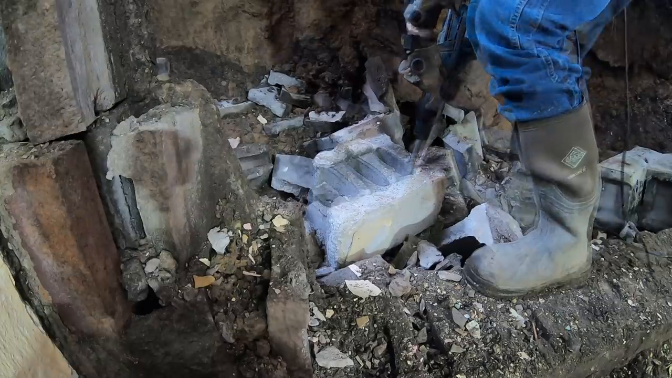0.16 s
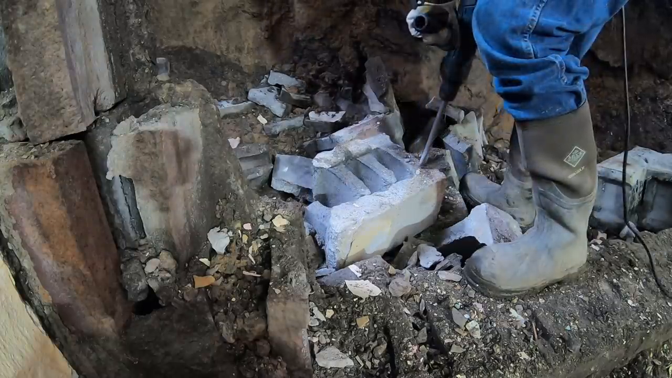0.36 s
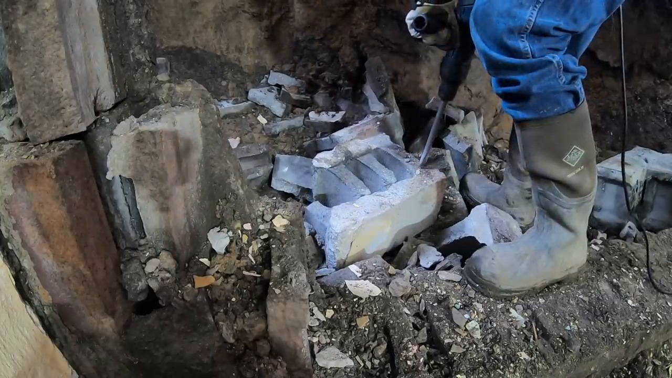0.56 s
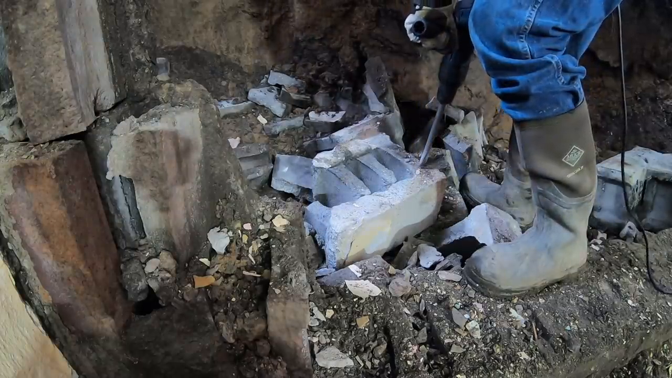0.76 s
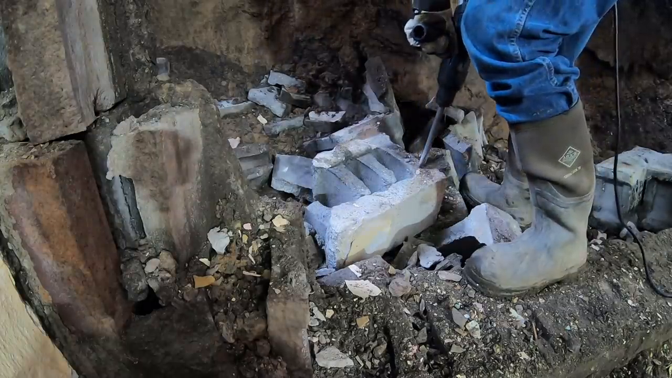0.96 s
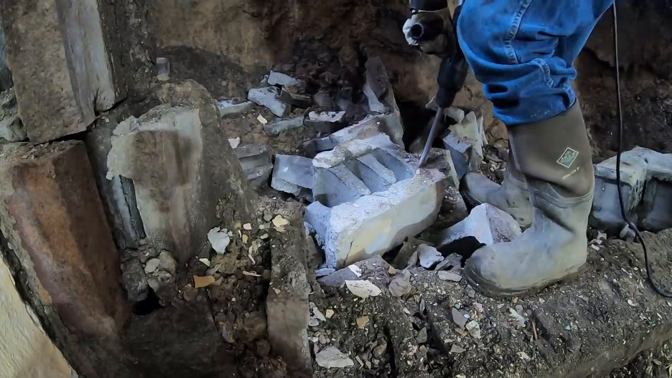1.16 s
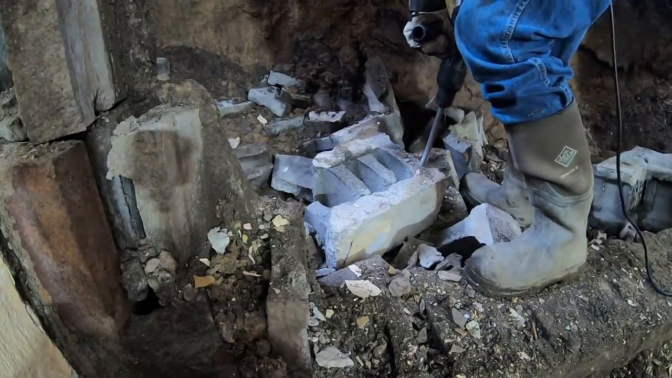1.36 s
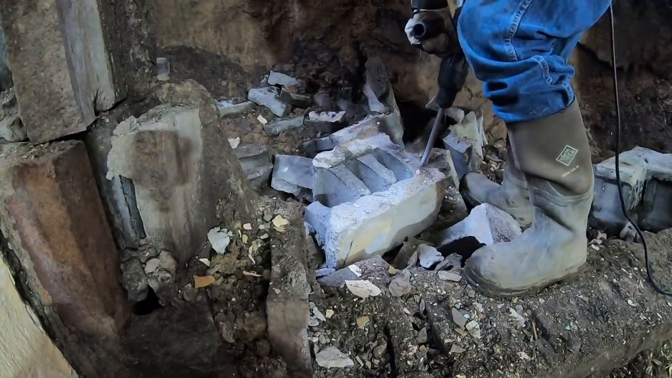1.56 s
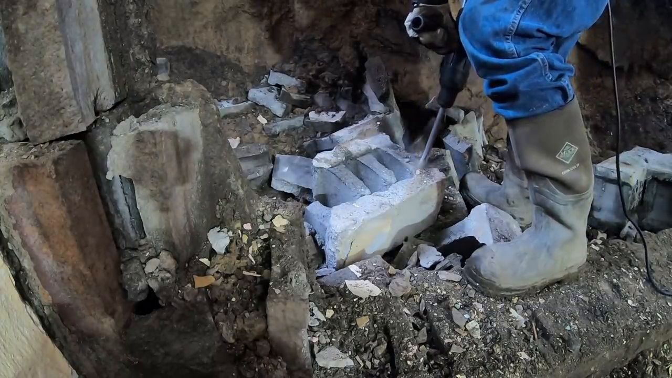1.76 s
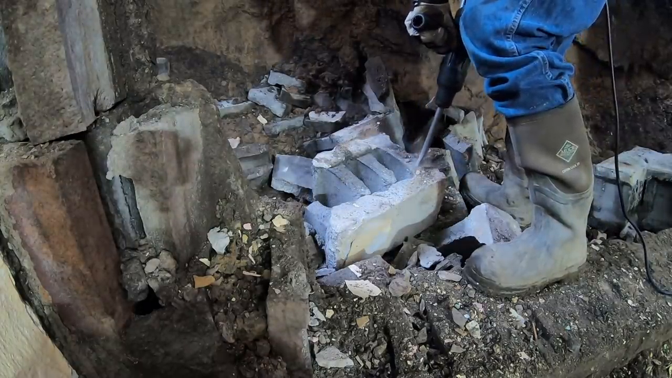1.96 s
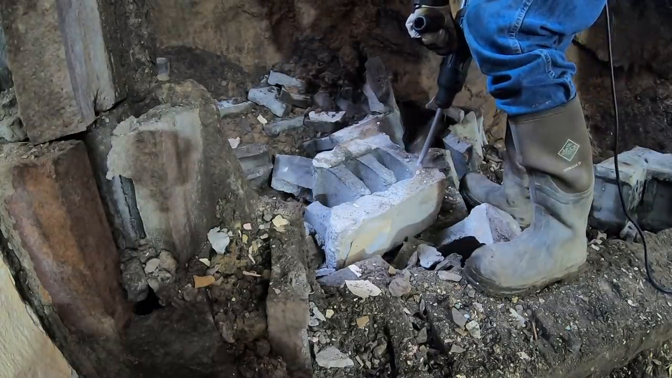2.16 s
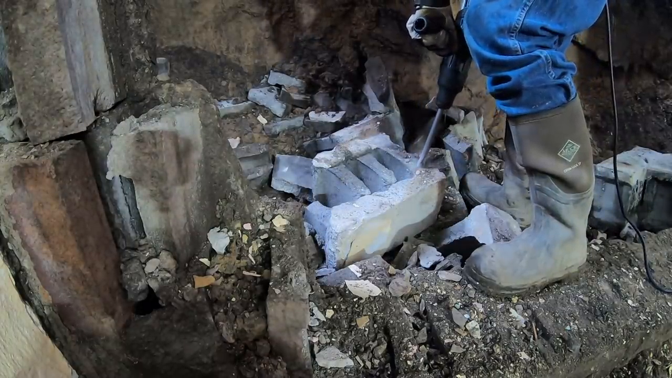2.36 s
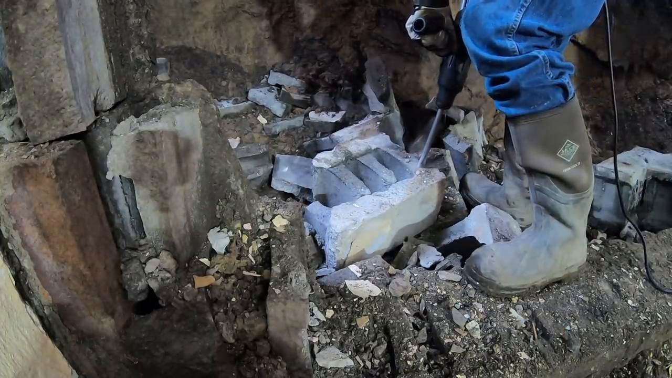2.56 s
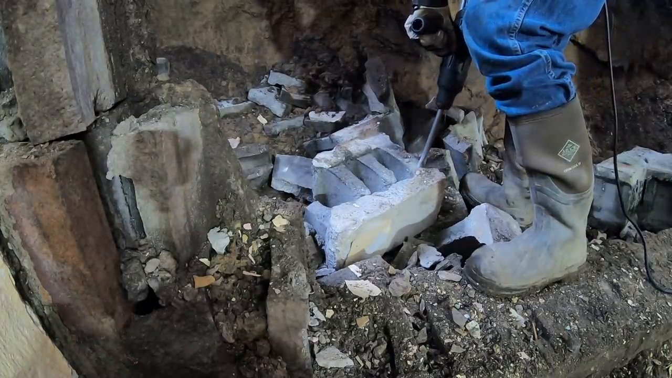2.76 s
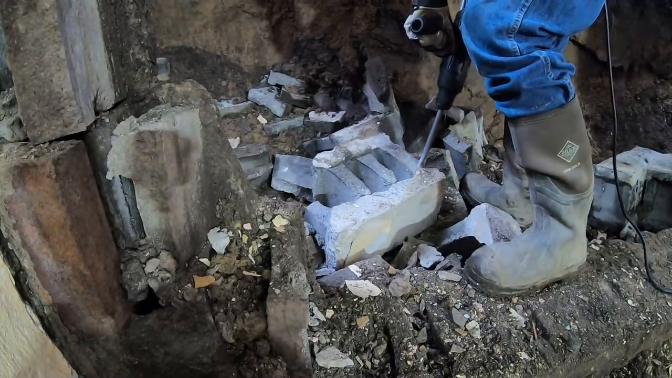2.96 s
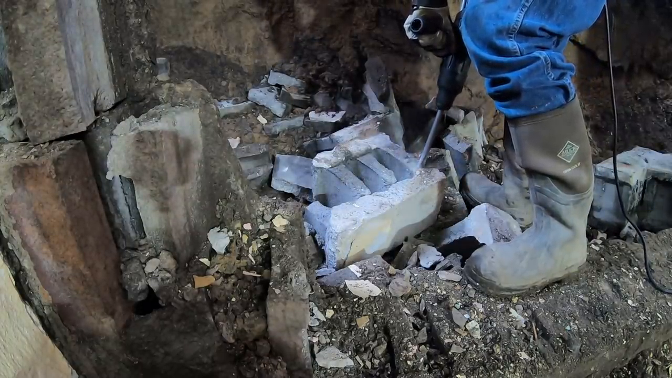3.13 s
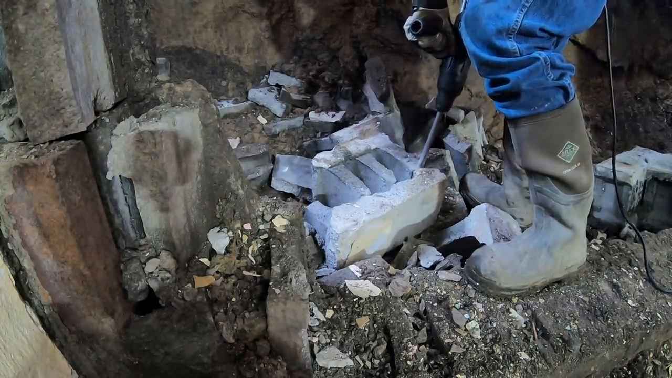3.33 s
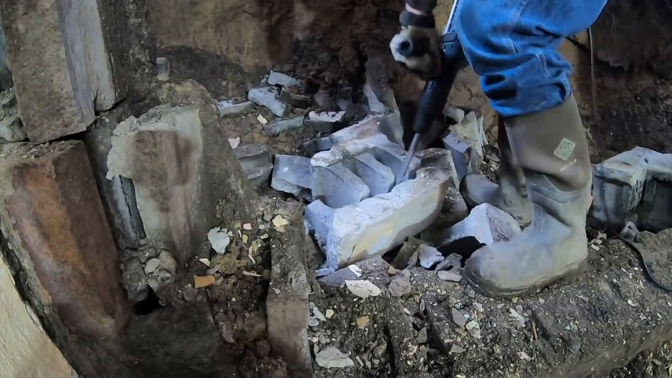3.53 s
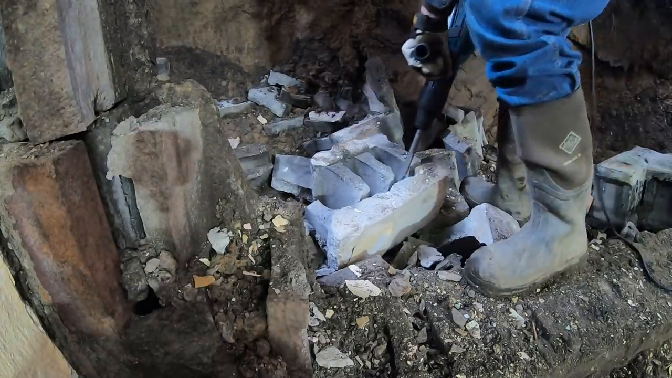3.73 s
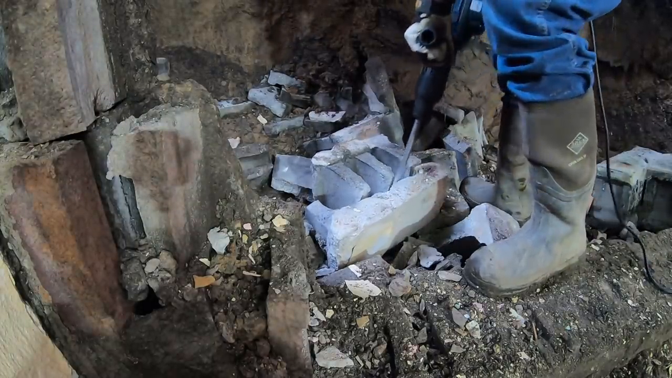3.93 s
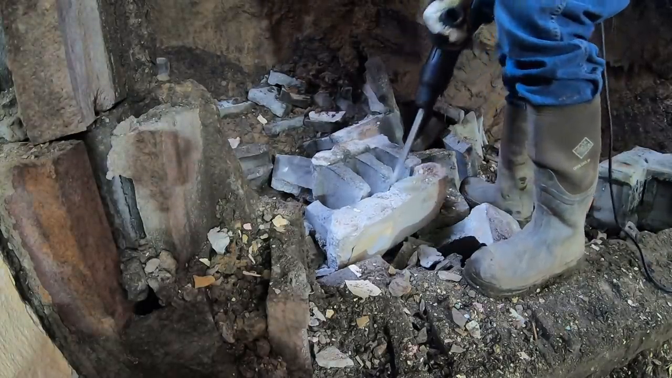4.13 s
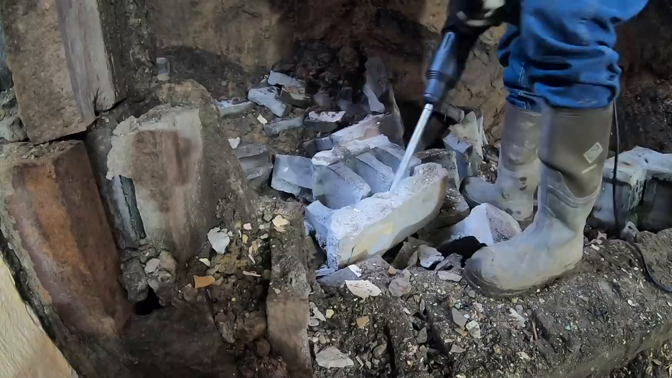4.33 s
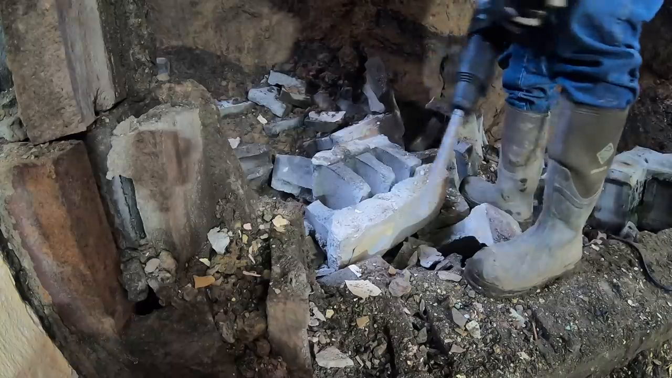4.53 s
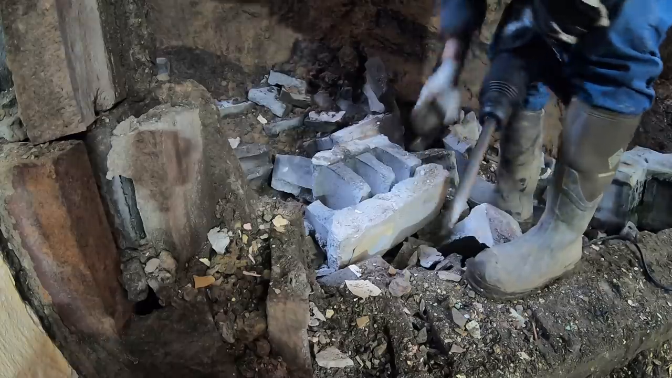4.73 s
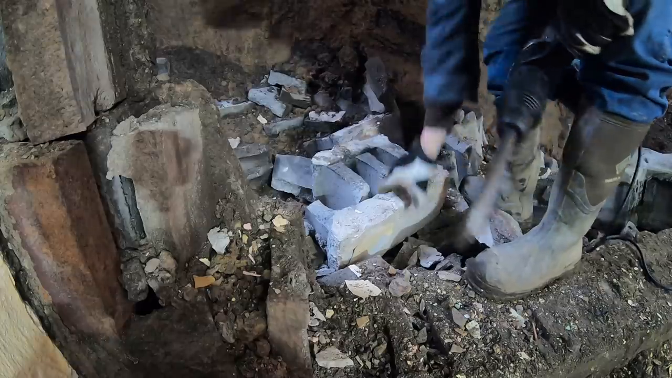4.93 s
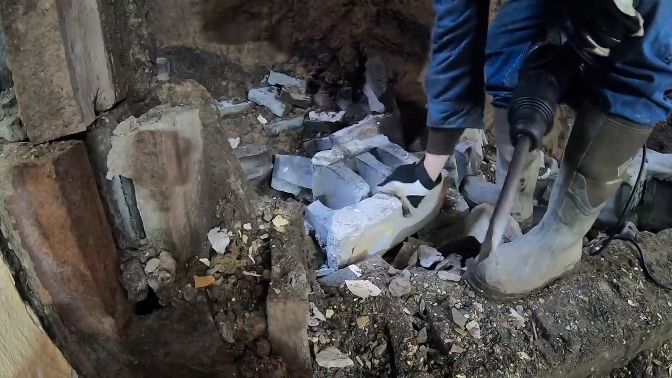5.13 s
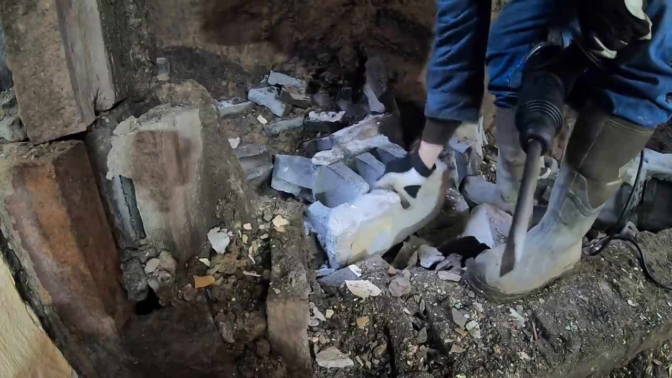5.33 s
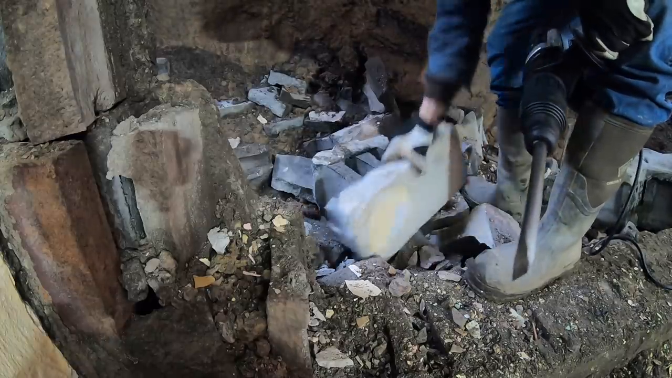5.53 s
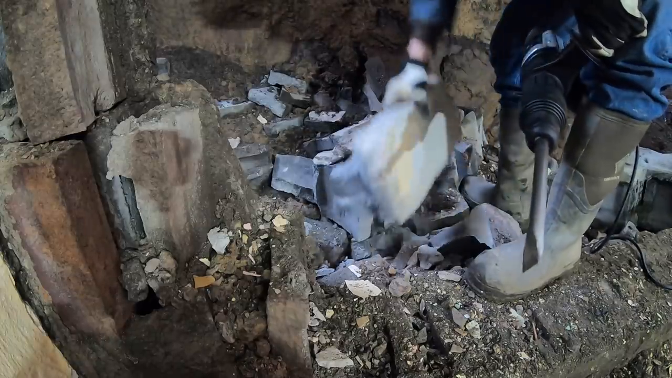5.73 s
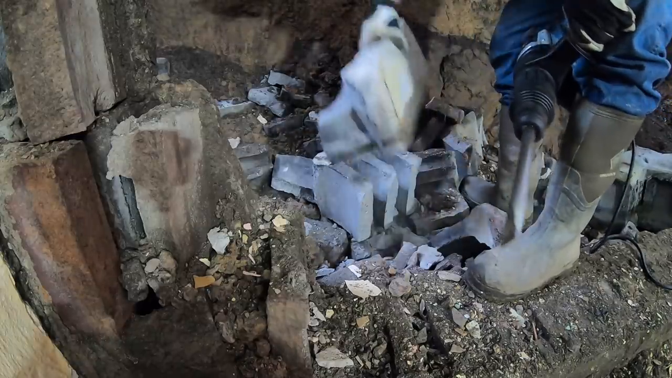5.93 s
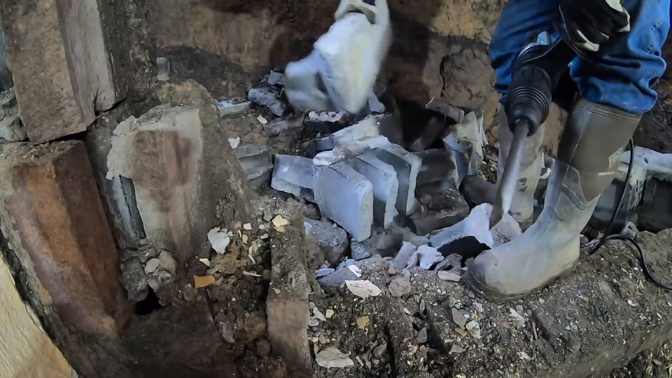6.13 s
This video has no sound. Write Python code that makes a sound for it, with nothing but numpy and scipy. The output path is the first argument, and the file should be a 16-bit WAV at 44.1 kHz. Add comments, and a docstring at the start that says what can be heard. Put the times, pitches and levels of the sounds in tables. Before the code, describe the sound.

An electric demolition hammer chisels a concrete block in two bursts and winds down, then a loose piece scrapes and clinks over rubble.

```python
"""An electric demolition hammer chisels a hollow concrete block in two bursts in a basement. Each piston
blow rings the steel and the block and thuds through the floor; the motor whirrs, rattles and whines,
coasting down after each burst. Chips drop, then a loose piece is dragged off the pile, knocking and
ringing. A generator drones outside; a camera with two microphones stands close by, shaken by the blows."""
import sys
import numpy as np
from scipy import signal
from scipy.fft import rfft, irfft, next_fast_len
from scipy.io import wavfile
from scipy.ndimage import uniform_filter1d

SR = 44100
rng = np.random.default_rng(int(sys.argv[2]) if len(sys.argv) > 2 else 0)


def store_pcm(level_fs):
    """Save levels as 16-bit WAV."""
    pcm = np.round(np.clip(level_fs, -1, 1) * 32767).astype(np.int16)
    wavfile.write(sys.argv[1], SR, np.atleast_2d(pcm).T)


N = 277371
T = np.arange(N) / SR
IDLE_HZ = 52.5  # crank speed the motor races toward once the chisel is free

# hammer bursts: start_s, chisel_free_s, switch_off_s, start_speed_hz, working_speed_hz, coast_time_s
BURSTS = [(.0027, .372, .32, 44.42, 44.42, .8), (1.1454, 3.548, 3.7, 10.91, 45.923, 1.15)]


def amp(db):
    return 10 ** (np.asarray(db) / 20)


def unit_rms(x):
    return x / np.sqrt(np.mean(x ** 2) + 1e-20)


def curves(rows):
    """One curve per column after the time, drawn through the breakpoints."""
    times, *columns = np.transpose(rows)
    return [np.interp(T, times, column) for column in columns]


def equalise(x, points):
    """Zero-phase EQ through (frequency_hz, gain_db) points."""
    size = next_fast_len(N + 4096)
    bins = np.fft.rfftfreq(size, 1 / SR)
    hz, db = np.transpose(points)
    gain = amp(np.interp(np.log(bins + 1), np.log(hz + 1), db))
    return irfft(rfft(x, size) * gain, size)[..., :N]


def ring(x, hz, db, t60):
    """One mode struck by x: a dying sine."""
    r, w = 10 ** (-3 / (t60 * SR)), 2 * np.pi * hz / SR
    return amp(db) * signal.lfilter([0, np.sin(w)], [1, -2 * r * np.cos(w), r * r], x)


def puff(clicks, t60):
    """Turns each click into a short puff of noise."""
    return signal.lfilter([1], [1, -10 ** (-3 / (t60 * SR))], abs(clicks)) * rng.standard_normal(N)


def wander(rate_hz):
    """Smooth random drift of about unit rms."""
    steps = rng.standard_normal(int(7 * rate_hz) + 4)
    return np.interp(T * rate_hz, np.arange(len(steps)), steps) * np.sqrt(1.5)


def crackle(per_s, spread_db):
    """Random clicks of uneven strength and sign."""
    strength = amp(spread_db * np.minimum(rng.exponential(1, N), 3))
    return strength * (rng.random(N) < per_s / SR) * rng.choice([-1, 1], N)


def room_air():
    """Still basement air: a faint, low stereo noise bed."""
    # air spectrum: frequency_hz, gain_db
    spectrum = [(12, -26.5), (20, -11), (129, -10), (478, -27.5), (667, -19), (1230, -22), (1820, -13.5),
                (2330, -33.5), (7730, -58), (15500, -85)]
    air = unit_rms(equalise(rng.standard_normal((2, N)), spectrum))
    return amp(-56) * (air + 0.26 * air[::-1])


def generator(speed_hz=29.77):
    """The engine outside drones on its low orders, wavering a little."""
    # engine orders: speed_multiple, level_db
    orders = [(1, 1.5), (2, -1), (3, -3.5), (4, 6.5), (5, 3), (6, -7), (7, -16.5)]
    # drone fader: time_s, level_db
    fader = [(0, -43), (.5, -49.5), (.75, -46), (1.1, -43), (1.3, -40), (3.6, -68), (4.2, -53.5),
             (5, -46.5), (6.29, -43)]
    turns = np.cumsum(speed_hz * (1 + 0.0021 * wander(2.01))) / SR
    drone = sum(amp(db + 1.4 * wander(9)) * np.sin(2 * np.pi * (k * turns + rng.random()))
                for k, db in orders)
    return amp(curves(fader)[0]) * unit_rms(drone)


def walls(x):
    """Two reverb tails of sparse reflections, each band dying at its own speed."""
    # basement decay: frequency_hz, t60_s
    decay = [(60, 0.18), (300, 0.52), (1000, 0.58), (3000, 0.037), (9000, 0.24), (16000, 0.013)]
    taps = np.zeros((2, SR // 2))
    slots = np.arange(60, SR // 2 - 20, 20)
    at = slots + rng.integers(0, 20, (2, len(slots)))
    np.put_along_axis(taps, at, rng.choice([-1., 1.], at.shape), 1)
    bins, t, bands = signal.stft(taps, SR, nperseg=256)
    hz, t60 = np.transpose(decay)
    band_t60 = np.interp(np.log(bins + 1), np.log(hz), t60)[:, None]
    tail = signal.istft(bands * amp(-60 * t / band_t60), SR, nperseg=256)[1]
    tail /= np.linalg.norm(tail, axis=1, keepdims=True)
    return signal.fftconvolve(x[None], tail, axes=1)[:, :N]


def grit():
    """Chips of rubble drop: dry ticks, some with a dull bump."""
    # falling chips: start_s, level_db, bump_relative_db
    chips = [(0.8904, -24, -14), (0.9649, -26, 0), (1.058, -41, -10), (3.544, -12.5, -22),
             (3.571, -19, 0.5), (5.2051, -50, -19), (5.241, -31.5, -16), (5.3214, -37, -10),
             (5.419, -36, 10), (5.451, -31, -10), (5.6062, -40, -2), (5.9284, -39, -7.5),
             (5.985, -38.5, -6), (6.0128, -36.5, -18)]
    ticks, bumps = np.zeros((2, N))
    for start, db, bump_db in chips:
        at = round(start * SR)
        ticks[at], bumps[at] = amp(db), amp(db + bump_db)
    tick = equalise(puff(ticks, 0.019), [(500, -38), (3000, 1.5), (8000, 0), (16000, -38)])
    return tick + equalise(puff(bumps, 0.047), [(60, 0), (250, 6.5), (600, 2), (1500, -30)])


def drag_strokes(attack_s=0.013, release_db_per_s=291):
    """Level and brightness of the grinding: each stroke starts fast, holds and dies away."""
    # strokes over the rubble: start_s, length_s, level_db, tilt_db_per_octave
    strokes = [(5.436, 0.067, -26.5, 6), (5.54, 0.044, -23.5, 1), (5.69, 0.14, -25, 5),
               (5.793, 0.092, -34, 4.5)]
    level, brightness = np.zeros((2, N))
    for start, length, db, tilt in strokes:
        attack = np.clip((T - start) / attack_s, 0, 1)
        level += attack * amp(db - release_db_per_s * np.maximum(T - start - length, 0))
        brightness[T >= start] = tilt
    return level, brightness


def loose_piece(lift_s=5.65, free_hz=(855, 1406)):
    """Small catches and knocks ring the dragged piece; until it lifts, the pile mutes all but two modes."""
    # modes of the piece: pitch_hz, level_db, t60_s
    modes = [(172.4, -10.5, 0.066), (589, -11.5, 0.23), (676, 2, 0.14), (852, -4.5, 0.42), (918, -2, 0.12),
             (1084, -13, 0.2), (1416, -11, 0.26), (1613, -6.5, 0.46), (1778, -6.5, 0.46), (2186, -18, 0.26),
             (2610, -11, 0.33), (2960, -17, .12), (3200, -6, 0.12), (3430, -18, 0.17)]
    # knocks on the pile: start_s, level_db, tilt_db_per_octave
    knocks = [(5.446, -33, 9), (5.552, -26, 7), (5.661, -19, 3), (5.675, -31.5, 11), (5.706, -28, -7),
              (5.815, -27.5, -2), (5.87, -24, 1.5), (5.888, -31, 0.5)]
    rubble_grip, glove_grip = .45, .71  # contact shortens the ring by these factors
    lying_db = -20 * (T < lift_s)

    def muted_db(hz):
        return lying_db * (min(abs(hz / free - 1) for free in free_hz) > .03)

    level, brightness = drag_strokes()
    rub = unit_rms(crackle(per_s=1500, spread_db=2.8)) * level
    ringing = np.zeros(N)
    for hz, db, t60 in modes:
        drive_db = brightness * np.log2(hz / 1000) + 2.8 * wander(17) + muted_db(hz)
        ringing += ring(rub * amp(drive_db), hz, db - 34.5, rubble_grip * t60)
    scrape = equalise(puff(rub * amp(lying_db), 0.0035),
                      [(60, -26), (200, -53), (700, -5), (2500, -16), (4500, -33), (9000, -32),
                       (16000, -98)])
    starts, knock_db, tilt = np.transpose(knocks)
    at = np.round(starts * SR).astype(int)
    taps = np.zeros(N)
    for hz, db, t60 in modes:
        drive_db = knock_db + tilt * np.log2(hz / 1000) + muted_db(hz)[at]
        taps[at] = amp(drive_db + 2 * rng.standard_normal(len(at))) * rng.choice([-1, 1], len(at))
        ringing += ring(taps, hz, db, glove_grip * t60)
    taps[at] = amp(knock_db + lying_db[at])
    clack = equalise(puff(taps, 0.073), [(300, -13), (2000, -9), (8000, -4.5), (16000, -51)])
    return ringing + scrape + clack


def crank(spin_up_s=.2074, race_s=.15, friction_hz=7.7):
    """Turns a second as the crank spins up, races free and coasts, and a gate for the chisel at work."""
    speed, working = np.zeros((2, N))
    for start, free, off, start_hz, work_hz, coast_s in BURSTS:
        powered_s = np.minimum(T, off)
        lag = np.exp(-(np.maximum(powered_s - start, 0) / spin_up_s) ** 1.0848)
        race = 1 - np.exp(-np.maximum(powered_s - free, 0) / race_s)
        driven_hz = work_hz - (work_hz - start_hz) * lag + (IDLE_HZ - work_hz) * race
        hz = (driven_hz + friction_hz) * np.exp((powered_s - T) / coast_s) - friction_hz
        speed = np.where((T >= start) | (speed == 0), np.maximum(hz, .5), speed)
        working[(T >= start) & (T < free)] = 1
    return speed, working


def gear_tone(hz, db, case_hz=(696, 1280, 2320, 3660), half_width_hz=170):
    """A fuzzy gear tone that swells as it crosses a resonance of the case."""
    flare = sum(1 / (1 + ((hz - peak) / half_width_hz) ** 2) for peak in case_hz)
    level = amp(db + 8 * flare + 2.9 * wander(70))
    return level * np.sin(2 * np.pi * np.cumsum(hz + 45 * wander(250)) / SR)


def motor(mesh_per_turn=103.7, dull_s=1.062):
    """Fan and brush whirr, gear rattle in the case, and a mesh whine that falls as the rotor coasts."""
    # whirr and rattle fader: time_s, level_db
    fader = [(0, -31), (.38, -29), (.6, -32), (1.05, -37), (1.07, -45), (1.12, -35), (1.19, -30),
             (1.3, -36.5), (2.1, -30.5), (3.5, -30), (3.56, -29), (3.7, -27), (4.1, -32), (4.35, -34),
             (4.5, -33), (4.68, -35.5), (4.8, -37), (5.0, -37), (5.3, -41), (5.6, -53), (6.0, -63.5)]
    # fan and brush spectrum: frequency_hz, gain_db
    spectrum = [(88, -49), (150, -11), (189, -33), (436, -20), (509, -11), (1450, 0), (1730, -1.5),
                (3620, -2), (6230, -14), (7560, -11), (15500, -52.5)]
    # gear case modes: pitch_hz, width_hz, level_db
    case_modes = [(695, 21, -3), (1303, 44, -4.5), (1737, 32, -4), (2270, 254, 20.5), (2715, 124, 16.5),
                  (4720, 230, -19.5)]
    # gear train tones: mesh_pitch_ratio, level_db
    gears = [(1, 3.5), (0.67, -3), (.4, 0.5), (0.33, -22), (1.8, -11), (.58, -7.5), (.32, -10.5)]
    speed, working = crank()
    octaves = np.log2(speed / IDLE_HZ)
    dull_db = -56 * (T > dull_s) * np.exp(-abs(T - dull_s) / .045)  # brief dip before the restart
    treble_db = 4 + 2 * octaves + dull_db
    whirr = equalise(rng.standard_normal(N), spectrum)
    treble = signal.sosfilt(signal.butter(2, 4000, "high", fs=SR, output="sos"), whirr)
    whirr = unit_rms(whirr + treble * (amp(treble_db) - 1))
    teeth = crackle(per_s=1200, spread_db=2)
    rattle = unit_rms(sum(ring(teeth, hz, db, 2.35 / width) for hz, width, db in case_modes))
    whine = sum(gear_tone(ratio * mesh_per_turn * speed, db) for ratio, db in gears)
    whine_db = -37.5 + 13 * octaves - 15 * uniform_filter1d(working, 2000)  # ducks while chiselling
    flutter_db = np.minimum(3 - octaves, 9)  # deeper as the gears slow
    whirr *= amp(0.25 * flutter_db * wander(40))
    rattle *= amp(-8 + flutter_db * np.clip(.5 + wander(45), -3, 2))
    return amp(curves(fader)[0] - 2) * (whirr + rattle) + amp(whine_db) * whine


def floor_thud(hits, thud_db, boom_db, lag_s=0.002565):
    """Just after each blow the floor thuds and booms, and the ceiling echoes it."""
    # thud modes: pitch_hz, level_db, t60_s
    thud_modes = [(236, -9.5, 0.051), (310, 2.5, 0.013), (345.3, -10, 0.071), (558, -15.5, 0.044)]
    # deep ground modes: pitch_hz, level_db, t60_s
    boom_modes = [(88.4, -19, 0.05), (141.6, -21.5, 0.019), (188, -17.5, 0.13)]
    # ceiling echoes: delay_s, level_db
    echoes = [(.0086, -10.5), (0.0124, -12)]
    jolt = unit_rms(hits) + 0.29 * unit_rms(puff(hits, 0.09))  # the block never rocks the same way twice
    jolt = np.roll(jolt * amp(thud_db - 26 + 1.1 * wander(25.21)), round(lag_s * SR))
    thud = -sum(ring(jolt, *mode) for mode in thud_modes)
    thud -= sum(ring(jolt * amp(boom_db), *mode) for mode in boom_modes)
    thud += sum(amp(db) * np.roll(thud, round(delay * SR)) for delay, db in echoes)
    thud = signal.sosfilt(signal.butter(2, [60, 900], "band", fs=SR, output="sos"), thud)
    return thud * amp([[-.5], [.5]])


def camera_shake(level):
    """The ground shakes the camera: an uneven rumble, heavier on the right."""
    noise = rng.standard_normal((2, N))
    rumble = equalise(noise, [(10, -10), (30, -3.5), (70, -9), (200, -11.5), (500, -47)])
    return unit_rms(rumble) * level * amp(3.5 * wander(7.98)) * amp([[-5], [3]])


def sizzle(level):
    """Loose steel parts buzz in the top treble."""
    # buzz spectrum: frequency_hz, gain_db
    spectrum = [(9000, -60), (11000, -26.5), (13500, -14), (15200, -21.5), (16000, -41)]
    return equalise(rng.standard_normal(N) * level, spectrum)


def growing_crack(push, t60=.06):
    """One mode of the block slides down in pitch as the crack grows."""
    # sinking mode: time_s, pitch_hz, level_db
    glide = [(2.3, 3400, -42), (2.5, 3380, -27), (2.8, 3335, -22), (2.95, 3270, -25), (3.3, 3220, -26),
             (3.4, 3200, -42)]
    hz, db = curves(glide)
    phasor = np.exp(2j * np.pi * np.cumsum(hz) / SR)
    decay = 10 ** (-3 / (t60 * SR))
    return (phasor * signal.lfilter([1], [1, -decay], push * amp(db) / phasor)).imag


def concrete_block(hits, level_db):
    """The hollow block rings, each mode swelling as the chisel point passes its spot."""
    # block modes: pitch_hz, t60_s, level_db, swell_peak_s, swell_span_s, swell_db
    modes = [(651, 0.041, -12, 2.4, 1.3, 12), (799, 0.047, -5, 3.15, 0.28, 13.5),
             (973, 0.063, -8.5, 2.8, 0.73, 5.5), (1091, 0.06, -7.5, 0.97, 2, 3.5),
             (1257, 0.045, -7, 2.2, 2, 5.5), (1460, 0.044, -15, 3.46, .08, 18.5),
             (1594, 0.029, -11, 2.64, 0.73, 17), (1820, 0.0226, -9.5, 3.12, 0.387, 12.5),
             (1982, .04, -12, 2.25, 0.097, 18), (2010, .04, -17, 3.26, .3, 20),
             (2255, 0.012, -0.5, 2.37, 0.16, 12.5), (2844, 0.082, -12.5, 0.27, 0.18, 22),
             (2760, .05, -19, 2.26, 0.079, 30.5), (3060, 0.048, -12.5, 1.3, 1.4, 14.5),
             (4200, 0.022, -27, 1.5, .8, 6), (4590, .03, -21, 1.97, 0.39, 25.5),
             (895, 0.056, -24.5, 3.46, 0.11, 23.5)]
    push = amp(level_db) * (unit_rms(hits) + 0.22 * unit_rms(puff(hits, 0.011)))
    ringing = np.zeros(N)
    for k, (hz, t60, db, peak_s, span_s, swell_db) in enumerate(modes):
        swell = amp(swell_db * np.exp(-((T - peak_s) / span_s) ** 2))
        ringing += (-1) ** k * ring(push * swell, hz, db - 28.5, t60)
    return ringing + growing_crack(push)


def chisel(hits, level_db):
    """Each blow draws a sharp crack and a bright ring from the steel."""
    # steel modes: pitch_hz, level_db, t60_s
    modes = [(4620, -8.5, 0.028), (5250, -15, 0.029), (7180, -2.5, 0.026), (7610, -2, 0.035),
             (8250, -26.5, 0.021), (8840, -4.5, 0.066), (8986, -3.5, 0.08), (8933, -8, 0.14),
             (9800, -19, .03), (10140, -9.5, 0.018), (15100, -30.5, 0.062)]
    # impact spectrum: frequency_hz, gain_db
    crack_spectrum = [(500, -51), (2000, -12), (6000, -14), (7500, 0.5), (9500, -3), (11000, -13.5),
                      (12500, -58), (16000, -32)]
    shank = np.zeros(N)  # answers a random hair late, so its ringing starts afresh each blow
    at = np.flatnonzero(hits)
    shank[at + rng.integers(0, 12, N)[at]] = hits[at]
    chatter = (unit_rms(shank) + .5 * unit_rms(puff(hits, 0.012))) * amp(level_db)
    ringing = np.zeros(N)
    for hz, db, t60 in modes:
        onset = ring(chatter * amp(1.7 * wander(22)), hz, -51, 0.0033)  # builds over about a millisecond
        ringing += ring(onset, hz, db, t60)
    return ringing + equalise(unit_rms(puff(hits, 0.054)) * amp(level_db), crack_spectrum)


def piston():
    """The piston strikes once a crank turn until the chisel comes free."""
    hits, speed = np.zeros(N), crank()[0]
    for start, free, *_ in BURSTS:
        turns = np.cumsum(speed * ((T >= start) & (T < free))) / SR
        hits[1:][np.diff(np.ceil(turns)) > 0] = 1
    return hits


def hammer():
    """The blows drive steel, block and ground: returns the mono strikes and the stereo low end."""
    # bite of the chisel, one list per burst: time_s, thud_db, steel_db, block_db
    bite = [
        [(0.0, -27.5, -25.5, -32.5), (0.362, -27, -27.5, -41.5), (0.4, -26, -23, -62)],
        [(1.13, -46, -57, -34), (1.14, -40, -25, -32), (1.3, -28, -22, -36.5), (1.47, -28.5, -26, -36),
         (1.58, -31.5, -25, -39.5), (2.37, -30, -27.5, -31.5), (3.23, -29, -27, -32.5), (3.5, -31.5, -27, -30),
         (3.56, -42, -30, -50)],
    ]
    # how hard the ground takes the blows, on top of thud_db: time_s, boom_db, shake_db
    ground = [(0, -21, -18), (.4, -8, -23), (1.25, 14, -7.5), (1.5, 9, 2), (1.75, 8, -13.5),
              (2.5, -27, -7.5), (3.0, 0, -14.5), (3.55, 9, -6)]
    thud_db, steel_db, block_db = curves(bite[0] + bite[1])
    boom_db, shake_db = curves(ground)
    hits = piston()
    engaged = np.clip(uniform_filter1d(hits, 3000) * SR / 45, 0, 1)  # full at 45 blows a second
    strikes = chisel(hits, steel_db) + concrete_block(hits, block_db) + sizzle(engaged * amp(steel_db))
    low_end = floor_thud(hits, thud_db, boom_db) + camera_shake(engaged * amp(thud_db + shake_db))
    return strikes, low_end


def scene():
    """Near sounds sit in the middle; the walls spread them between the microphones, most in the treble."""
    # side reverb EQ: frequency_hz, gain_db
    width = [(60, -35.5), (110, -19), (200, -41.5), (380, -12.5), (700, -11.5), (1290, -8.5), (2380, -5.5),
             (4400, -3.5), (8120, -1.5), (15000, 2.5)]
    # stereo balance: frequency_hz, left_minus_right_db
    balance = [(60, -1.5), (110, 7.5), (200, -0.5), (380, -2.5), (700, -2), (1290, -3), (2380, -2.5),
               (4400, -0.5), (8120, -6.5), (15000, 0)]
    strikes, low_end = hammer()
    near = strikes + motor() + loose_piece() + grit()
    mid_tail, side_tail = walls(near)
    mid = near + amp(-9) * mid_tail
    side = equalise(side_tail, width)
    left = equalise(mid + side, [(hz, db / 2) for hz, db in balance])
    right = equalise(mid - side, [(hz, -db / 2) for hz, db in balance])
    return np.array([left, right]) + low_end + generator() + room_air()


def record(dry):
    """A steep low-pass trims the very top of the treble."""
    low_pass = signal.firwin(511, 15850, window=("kaiser", 9), fs=SR)
    return signal.oaconvolve(dry, low_pass[None], "same")


dry = scene()
out = record(dry)
store_pcm(out)
```